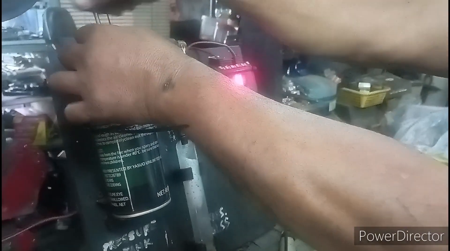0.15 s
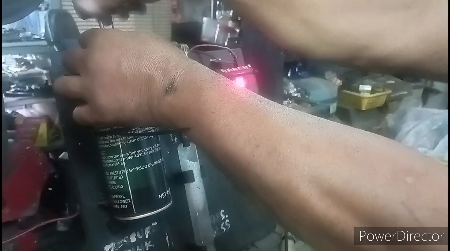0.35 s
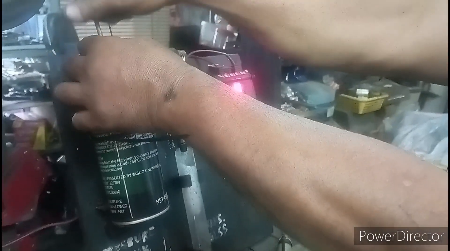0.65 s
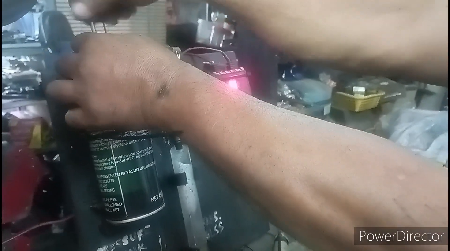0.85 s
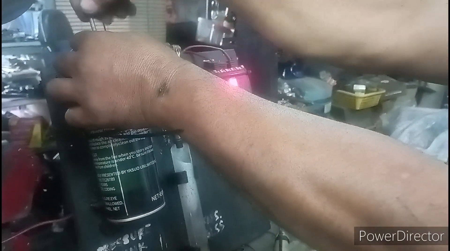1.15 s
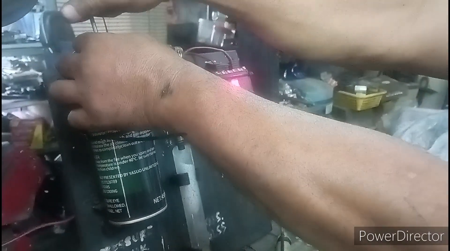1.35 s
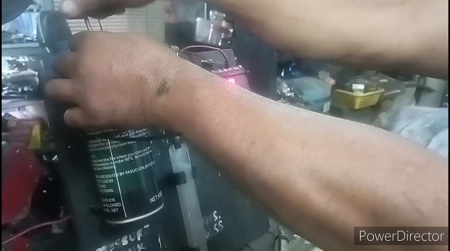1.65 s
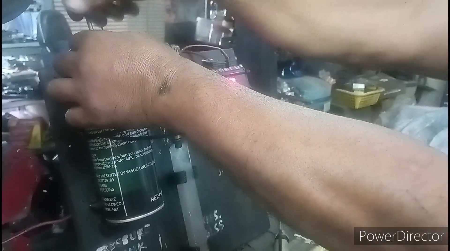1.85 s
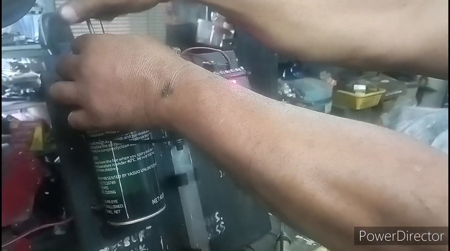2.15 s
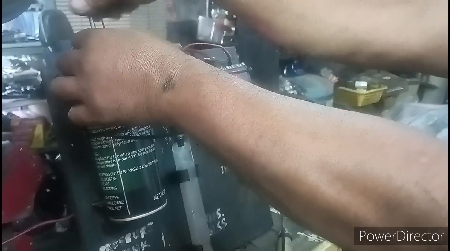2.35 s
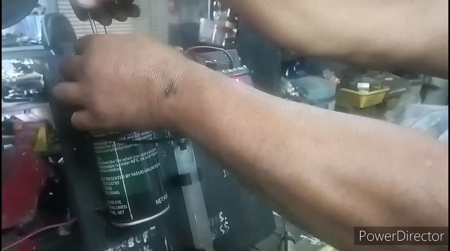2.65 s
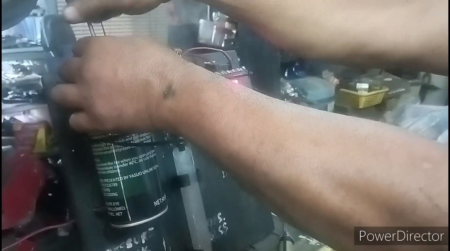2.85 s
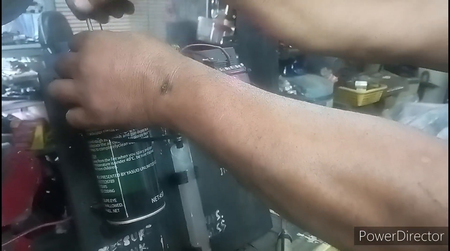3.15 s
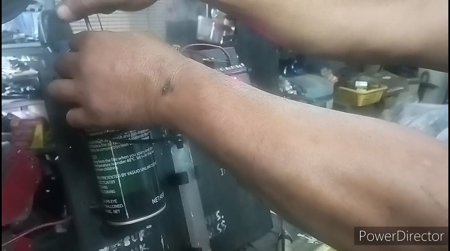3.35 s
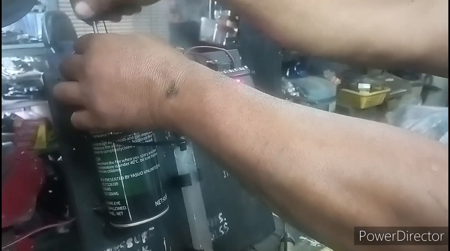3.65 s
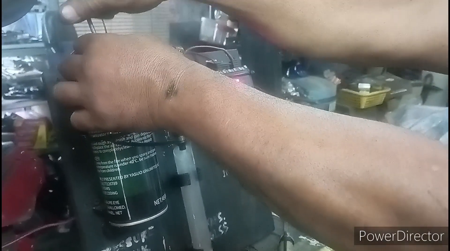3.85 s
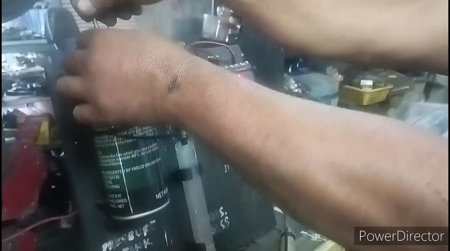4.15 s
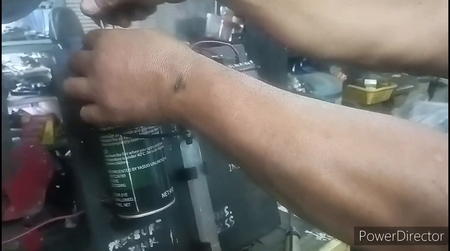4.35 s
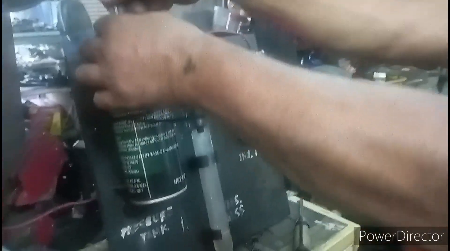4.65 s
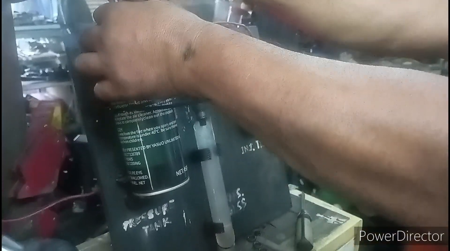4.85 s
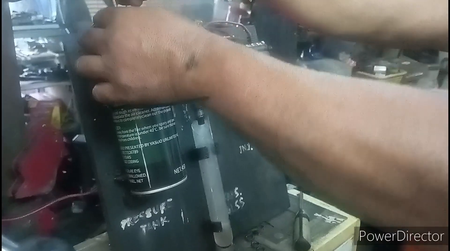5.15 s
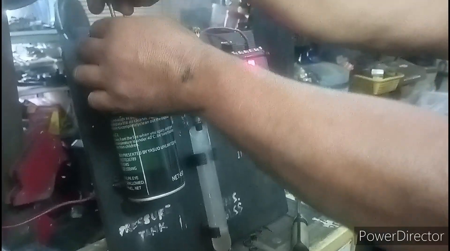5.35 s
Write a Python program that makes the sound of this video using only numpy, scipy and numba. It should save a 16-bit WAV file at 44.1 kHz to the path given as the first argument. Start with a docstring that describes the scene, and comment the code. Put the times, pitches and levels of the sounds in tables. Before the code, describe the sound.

A fuel injector ticks rapidly, then breaks into a loud, hissing, pulsing buzz as it sprays on a workshop test bench.

```python
"""Fuel injector on a workshop bench

An injector pulses about 39 times a second, close to a two-port microphone. At first the needle only
clicks, dry, its impacts exciting the modes of body and holder. Then fuel arrives: water hammer at each
opening and closing makes the feed pipe sing and the bench thump, and a turbulent spray hisses while
the needle is up. A low rumble and a few soft bumps lie underneath."""
import sys
import numpy as np
from scipy import signal
from scipy.fft import rfft, irfft
from scipy.io import wavfile
from scipy.ndimage import uniform_filter1d
from numba import njit

SR = 44100
rng = np.random.default_rng(int(sys.argv[2]) if len(sys.argv) > 2 else 0)


def unload_audio(sound):
    """Save the sound as a 16-bit wav file, at the path given as the first command line argument."""
    columns = np.transpose(np.atleast_2d(sound))
    # keep every value between -1 and 1, then stretch to whole-number steps
    steps = np.round(np.clip(columns, -1, 1) * 32767)
    wavfile.write(sys.argv[1], SR, steps.astype(np.int16))


N = 242991
T = np.arange(N) / SR

# Workshop noise spectrum. Each row: frequency in Hz, relative density in dB.
SHOP_SPECTRUM = [(15, -48), (25, -8), (149, 20), (270, 10.5), (936, -8.5), (2350, -8), (4610, -3),
                 (8590, -7), (10400, -15), (14800, -56), (16000, -28)]
# Handling bumps. Each row: start in seconds, peak level in dB, pitch in Hz.
BENCH_BUMPS = [(0.123, -49, 178), (0.219, -42, 243), (0.472, -37, 250), (0.595, -40, 108),
               (0.737, -36, 260), (0.839, -41, 99.6), (0.929, -38.5, 250), (1.55, -26.5, 260),
               (3.919, -39, 229), (4.198, -26, 230)]
# Modes of bench, injector body and holder. Each row: frequency in Hz, width in Hz, relative gain in dB.
BENCH_MODES = [(80, 11, -47), (129, 50, -8.5), (148, 26, -22.5), (205, 33, -14), (255.5, 20, -3),
               (752.3, 28.4, -5), (820, 29, -13.5), (952.5, 45, -4), (1113, 117, 7.5), (1208, 30, -10.5)]
BODY_MODES = [(5020, 380, -5), (7530, 390, 5), (8740, 220, 0), (8740, 230, 4.5), (10160, 1000, 11.5),
              (11620, 900, 15.5), (12400, 4500, 10.5), (14700, 1000, -19)]
HOLDER_MODES = [(2354, 107, -8), (3257, 226, -1), (4317, 220, -2), (5045, 186, -5.5), (6055, 207, -4.5)]
# The pipe's slow-dying mode, loud while air is left in the line. Each row: time in seconds, gain in dB.
SING_ENVELOPE = [(1.0, -82), (1.02, -40), (1.08, -27.5), (1.19, -31), (1.26, -35), (1.32, -30.5),
                 (1.45, -23.5), (1.5, -30), (1.54, -24), (1.6, -34), (1.7, -55), (4, -42), (5.51, -39.5)]
# Jolts in the line as it fills. Each row: time in seconds, size in dB relative to a closing.
LINE_KNOCKS = [(1.7222, 5), (1.7480, 8.5), (1.7735, -7)]
# Spectrum of spray and needle chatter. Each row: frequency in Hz, relative density in dB.
HISS_SPECTRUM = [(1500, -7), (2700, -4.5), (4000, -18), (5600, -3.5), (7500, 5), (10400, 8.5), (13000, 4),
                 (15000, 0), (16000, -2)]
# Port contrast, applied in part to each side. Each row: frequency in Hz, left minus right in dB.
PORT_CONTRAST = [(25, -2), (60, -1), (110, -2), (200, 3), (380, -1), (700, -8), (1290, 0), (2380, -4),
                 (4400, -12), (8120, 12.5), (15000, 29)]

PULSE_HZ = 39.18
SWITCH_ON_S, SWITCH_OFF_S = .0084, .0163  # within each cycle
LIFT_DELAY_MS, LIFT_DELAY_RISE_S = 1.493, 1.253  # final delay and its time constant
FUEL_ON_S, PRESSURE_RISE_S = .995, 0.78  # arrival and time constant
FILL_START_S, FILL_END_S, FILL_EMPTY = 1.58, 1.93, .74  # the holder fills from this empty share
SHOP_DB, ROOM_DB, ROOM_T60_S = -48.5, -3.5, 0.099
RUSH_PEAK_S, RUSH_DB, RUSH_RISE_DB_PER_S, RUSH_FALL_DB_PER_S = 1.06, -38, 132, 250
THUMP_DB, THUMP_EXPONENT = -32, 0.79  # gain at full pressure; power of the pressure
SURGE_DB, SURGE_EXPONENT, SURGE_AIR_DB = -28.5, 0.54, -2.5  # likewise; the last scales with empty share
BENCH_SLACK_SHARP = 0.048  # the bench rings this share higher before pressure loads it
SURGE_HZ, SURGE_WIDTH_HZ = 500.8, 26.3
LOWER_HZ, LOWER_WIDTH_HZ, LOWER_DB = 469.2, 36, -5.5
SING_HZ, SING_WIDTH_HZ = 548.5, 6
POCKET_HZ, POCKET_WIDTH_HZ, POCKET_DB = 4720, 530, -42
SPRAY_DB, SPRAY_SAG_DB_PER_S = -26, 1.15
CLICK_DB, CHATTER_HOLD_S, CHATTER_FADE_S = -40, 0.0018, 0.0011
SEAT_DRY_DB, SEAT_WET_DB = -6, -11  # closing click relative to opening click
HOLDER_DRY_DB, HOLDER_WET_DB = -50.5, -40
HOLDER_HOLLOW_DB, HOLDER_FILLING_DB = 6, 5  # scaled by the empty share; peaking halfway through filling
PORT_LAG_S, TOP_HZ = .00018, 15620


def undb(db):
    """Amplitude ratio of a level in dB."""
    return 10 ** (np.asarray(db) / 20)


def unit(x):
    """Normalisation to rms 1."""
    return x / np.sqrt(np.mean(x ** 2) + 1e-18)


def colour(x, points, scale=1, lag_s=0):
    """Spectral shaping by (Hz, dB) points on a log axis; a linear phase gives the delay."""
    hz = np.arange(N // 2 + 1) * SR / N + 1e-9
    point_hz, db = np.transpose(points)
    gain = undb(scale * np.interp(np.log(hz), np.log(point_hz), db))
    return irfft(rfft(x) * gain * np.exp(-2j * np.pi * hz * lag_s), N)


def cut(x, order, hz, kind):
    """Filter with a maximally flat passband."""
    return signal.sosfilt(signal.butter(order, hz, kind, fs=SR, output="sos"), x)


@njit
def svf(x, hz, width):
    """State-variable band-pass whose ring starts at a size independent of its width."""
    y, band, low = np.empty(len(x)), 0., 0.
    for i in range(len(x)):
        g, damping = np.tan(np.pi * hz[i] / SR), width[i] / hz[i]
        v = (band + g * (x[i] - low)) / (1 + g * (g + damping))
        band, low, y[i] = 2 * v - band, low + 2 * g * v, v / g
    return y


def resonate(x, hz, width_hz):
    """Driven damped oscillator, with steady or moving frequency and bandwidth."""
    return svf(x, np.ones(N) * hz, np.ones(N) * width_hz)


def modes(x, table, flip=-1, tune=1, blur=1):
    """Modal superposition; flip -1 opposes neighbours in phase, tune and blur scale pitch and width."""
    return sum(flip ** k * undb(db) * resonate(x, hz * tune, width * blur)
               for k, (hz, width, db) in enumerate(table))


def train(times, sizes):
    """Impulse train, each impulse shared linearly between two samples."""
    out, at = np.zeros(N + 1), times * SR
    keep = at < N - 1
    i, part = at[keep].astype(int), at[keep] % 1
    np.add.at(out, i, sizes[keep] * (1 - part))
    np.add.at(out, i + 1, sizes[keep] * part)
    return out[:N]


def fade(x, tau_s):
    """Exponential decay after every impulse."""
    return signal.lfilter([1], [1, -np.exp(-1 / (tau_s * SR))], x)


def noise_pair(envelope, apart):
    """Partially coherent noise at two ports under one envelope."""
    shared = rng.standard_normal(N)
    return envelope * (shared + apart * rng.standard_normal((2, N)))


def fuelled():
    """Ramp from 0 when dry to 1 once fuel has arrived."""
    return np.clip((T - FUEL_ON_S) / 0.039, 0, 1)


def since_fuel(t=T):
    """Seconds since the fuel arrived."""
    return np.clip(t - FUEL_ON_S, 0, None)


def pressure():
    """Fuel pressure as a share of its full value, approached exponentially."""
    return 1 - np.exp(-since_fuel() / PRESSURE_RISE_S)


def hollow():
    """Empty share of holder and line, falling linearly as they fill."""
    return FILL_EMPTY * np.clip((FILL_END_S - T) / (FILL_END_S - FILL_START_S), 0, 1)


def shop():
    """Stationary workshop noise, mostly coherent between the closely spaced ports."""
    mid, side = (colour(rng.standard_normal(N), SHOP_SPECTRUM) for _ in range(2))
    side = colour(side, [(30, 9), (100, -30.5), (1500, -8)])
    return undb(SHOP_DB) * unit(np.array([mid + side, mid - side]))


def room(x):
    """Diffuse reflections from bench and walls decay exponentially, independently at each port."""
    t = np.arange(int(.3 * SR)) / SR
    tail = rng.standard_normal((2, len(t))) * np.exp(-np.log(1000) * t / ROOM_T60_S)
    return undb(ROOM_DB) * signal.fftconvolve(x, unit(tail) / np.sqrt(len(t)), axes=1)[:, :N]


def bumps():
    """Handling drives a damped low resonance of the bench with short, noisy pushes."""
    out = np.zeros(N)
    for start_s, db, hz in BENCH_BUMPS:
        push = fade(train(np.array([start_s]), np.ones(1)), tau_s=0.047) * rng.standard_normal(N)
        ring = resonate(push, hz, width_hz=80)
        out += undb(db) * ring / np.abs(ring).max()
    return out


def first_rush():
    """Flow noise swells and dies in one unbroken hiss as fuel enters the line."""
    hiss = np.array([resonate(noise, hz=4700, width_hz=2000) for noise in noise_pair(1, apart=0.94)])
    late_s = T - RUSH_PEAK_S
    db = RUSH_DB - np.where(late_s < 0, -RUSH_RISE_DB_PER_S, RUSH_FALL_DB_PER_S) * late_s
    return undb(db) * unit(np.diff(hiss, prepend=0))


def bench_thump(hammer, drop):
    """Forced vibration: pressure steps in the pipe excite the modes of the bench."""
    force = fade(hammer - 0.45 * drop, tau_s=0.00024) + 0.024 * rng.standard_normal(N)
    ring = modes(force, BENCH_MODES, flip=0.98, tune=1 + BENCH_SLACK_SHARP * (1 - pressure()))
    return undb(THUMP_DB) * pressure() ** THUMP_EXPONENT * unit(ring)


def pipe_wall(x):
    """Transmission through the wall's broad resonance rounds the onset of a ring."""
    for _ in range(2):
        x = unit(resonate(x, hz=525, width_hz=300))
    return x


def column_surge(hammer, drop, vent, stiffness_scatter):
    """Two modes of the fuel column, damped by the open nozzle; stiffening raises the upper one."""
    knock_s, knock_db = np.transpose(LINE_KNOCKS)
    jump = hammer + train(knock_s, undb(knock_db))
    upper_hz = SURGE_HZ * (1 + fade(stiffness_scatter, tau_s=0.0082))  # jumps at closing, then sags
    upper = resonate(jump + 0.27 * drop, upper_hz, SURGE_WIDTH_HZ + 60 * vent)
    turbulence = 0.013 * rng.standard_normal(N)
    lower = resonate(jump + 0.82 * drop + turbulence, LOWER_HZ, LOWER_WIDTH_HZ + 22 * vent)
    gain = undb(SURGE_DB + SURGE_AIR_DB * hollow()) * pressure() ** SURGE_EXPONENT
    return gain * pipe_wall(unit(upper) + undb(LOWER_DB) * unit(lower))


def column_song(hammer, drop):
    """A lightly damped mode sings; cubic nonlinearity adds its third harmonic when it is loud."""
    tone = resonate(hammer + 0.5 * drop, SING_HZ, SING_WIDTH_HZ)
    third = resonate(tone ** 3, 3 * SING_HZ, width_hz=100)
    third = unit(cut(third, 4, 2 * SING_HZ, "high"))
    db = np.interp(T, *np.transpose(SING_ENVELOPE))
    return undb(db) * pipe_wall(tone) + undb(2 * db - 6.5) * third


def feed_pipe(opens, closes, scatter):
    """Water hammer: pressure drops at opening and jumps at closing, driving column and bench."""
    hammer = train(closes, undb(0.2 * scatter["hammer"]))
    drop = train(opens, undb(1.9 * scatter["drop"]))
    vent = nozzle_flow(opens, closes, np.zeros(len(opens)))
    surge = column_surge(hammer, drop, vent, train(closes, 0.12 + .028 * scatter["stiffness"]))
    sound = surge + column_song(hammer, drop) + bench_thump(hammer, drop)
    return cut(sound, 3, [62, 1900], "band")  # the bench radiates no deep bass, and the steps are soft


def nozzle_flow(opens, closes, scatter):
    """The needle acts as a valve: flow is on while it is up and trails off after."""
    size = undb(0.37 * scatter)
    gate = np.clip(np.cumsum(train(opens, size) - train(closes, size)), 0, None)
    return gate + fade(train(closes, 0.23 * size), tau_s=0.002)


def spray(opens, closes, scatter):
    """Turbulent jet noise in gritty bursts, growing with pressure and slowly weakening with time."""
    grit = undb(3.2 * unit(uniform_filter1d(rng.standard_normal(N), size=20)))
    jets = noise_pair(nozzle_flow(opens, closes, scatter["flow"]) * grit, apart=1.08)
    hiss = np.array([unit(colour(jet, HISS_SPECTRUM)) + 0.2 * unit(modes(jet, BODY_MODES))
                     for jet in jets])
    return pressure() * undb(SPRAY_DB - SPRAY_SAG_DB_PER_S * since_fuel()) * unit(hiss)


def air_pocket(seat):
    """Trapped air resonates at each closing until fuel fills the pocket."""
    ping = unit(resonate(seat, POCKET_HZ, POCKET_WIDTH_HZ))
    return undb(POCKET_DB) * fuelled() * hollow() * unit(np.diff(ping, prepend=0))


def holder(blows, flow):
    """Impacts and flow excite the holder's modes, higher and shorter while it is part-filled."""
    shake = 10 * blows + noise_pair(fade(blows, tau_s=0.0023) + 0.5 * pressure() * flow, apart=0.58)
    empty = hollow()
    rings = [modes(force, HOLDER_MODES, tune=1 + 0.061 * empty, blur=1 + 0.5 * empty) for force in shake]
    wet_db = HOLDER_WET_DB + HOLDER_HOLLOW_DB * empty
    wet_db += HOLDER_FILLING_DB * np.sin(np.pi * empty / FILL_EMPTY)
    gain = undb(HOLDER_DRY_DB) + undb(wet_db) * pressure() ** 0.64
    return gain * unit(cut(rings, 2, 2600, "high"))


def needle(opens, closes, scatter):
    """Impact excitation: the needle hits stop and seat and chatters; body, holder and air pocket ring."""
    stop = train(opens, undb(0.7 * scatter["stop"]))
    seat = train(closes, undb(0.63 * scatter["seat"]))
    hits = stop + undb(SEAT_DRY_DB + (SEAT_WET_DB - SEAT_DRY_DB) * fuelled()) * seat
    held = signal.lfilter(np.ones(int(CHATTER_HOLD_S * SR)), [1], hits)
    chatter = noise_pair(fade(held + 15 * hits, CHATTER_FADE_S), apart=0.26)
    body = np.array([unit(modes(force, BODY_MODES)) + 0.83 * unit(colour(force, HISS_SPECTRUM))
                     for force in chatter])
    flow = nozzle_flow(opens, closes, scatter["flow"])
    return undb(CLICK_DB) * unit(body) + holder(stop + 1.6 * seat, flow) + air_pocket(seat)


def valve_cycles():
    """Periodic switching with random scatter per cycle; the needle lifts later as its load grows."""
    start = np.arange(int(N / SR * PULSE_HZ) + 1) / PULSE_HZ
    open_jitter, close_jitter, *draws = rng.standard_normal((len(start), 8)).T
    delay_ms = LIFT_DELAY_MS * (1 - np.exp(-since_fuel(start) / LIFT_DELAY_RISE_S))
    opens = start + SWITCH_ON_S + delay_ms / 1000 + .00002 * open_jitter
    closes = start + SWITCH_OFF_S + .00002 * close_jitter
    return opens, closes, dict(zip(["stop", "seat", "flow", "hammer", "drop", "stiffness"], draws))


def scene():
    """Superposition of direct sound, reflections and background at the two ports."""
    cycles = valve_cycles()
    low = feed_pipe(*cycles)
    bright = needle(*cycles) + spray(*cycles) + first_rush()
    return bright + room(bright + 0.18 * low) + low + bumps() + shop()


def record(dry):
    """Each port has its own frequency response, the right one hears later, and the top is cut."""
    left = colour(dry[0], PORT_CONTRAST, scale=0.22)
    right = colour(dry[1], PORT_CONTRAST, scale=-0.43, lag_s=PORT_LAG_S)
    return signal.sosfilt(signal.ellip(14, .2, 70, TOP_HZ, fs=SR, output="sos"), np.array([left, right]))


dry = scene()
out = record(dry)
unload_audio(out)
```